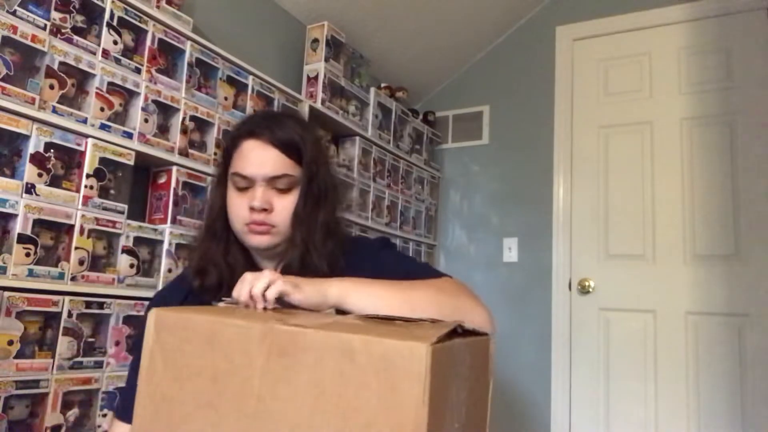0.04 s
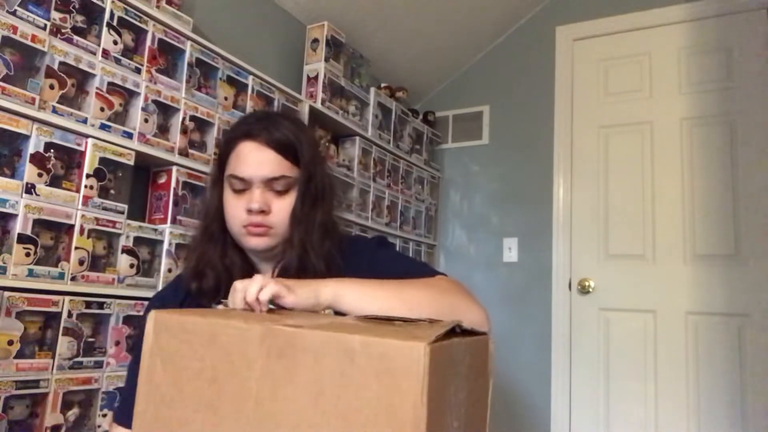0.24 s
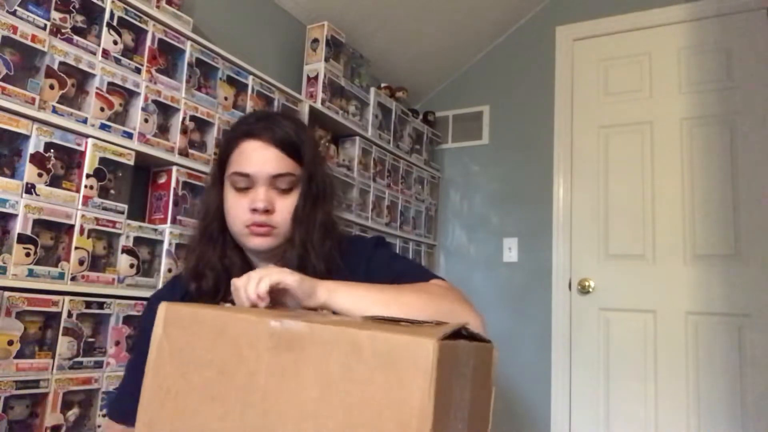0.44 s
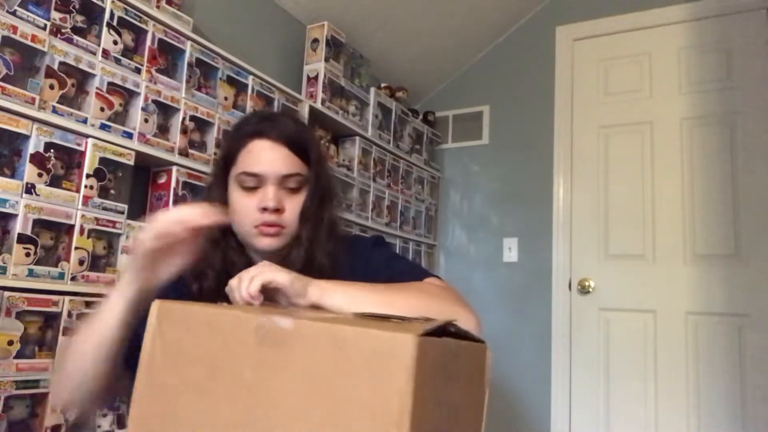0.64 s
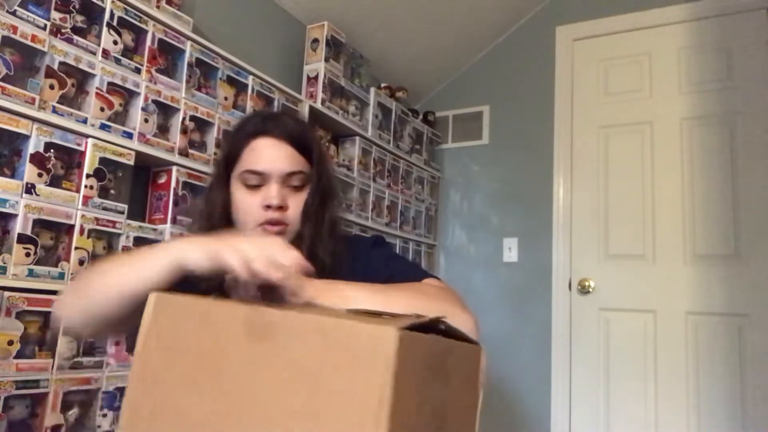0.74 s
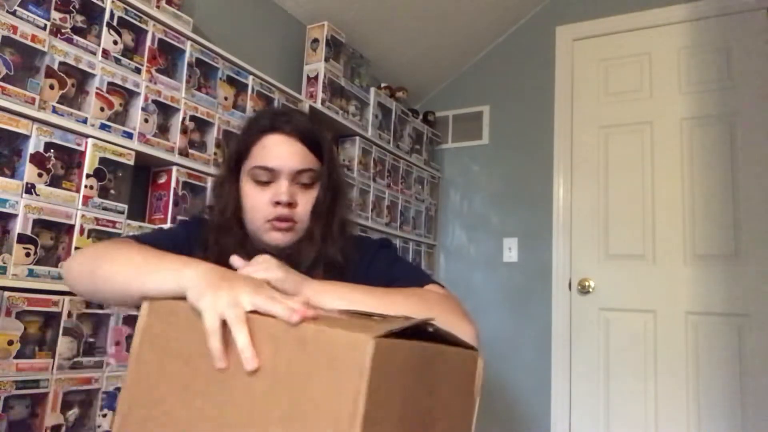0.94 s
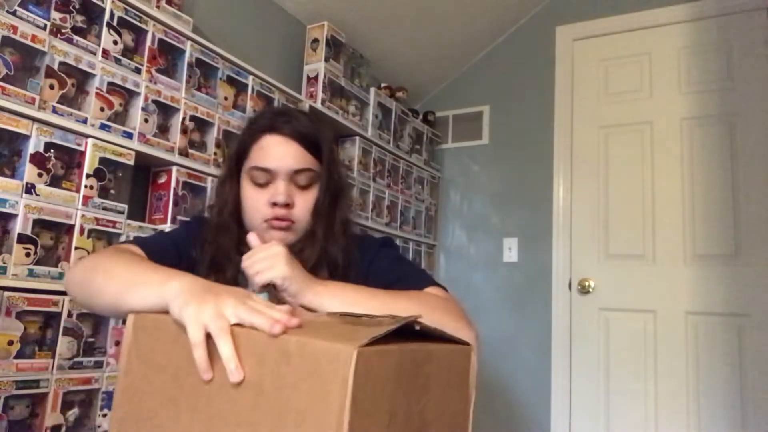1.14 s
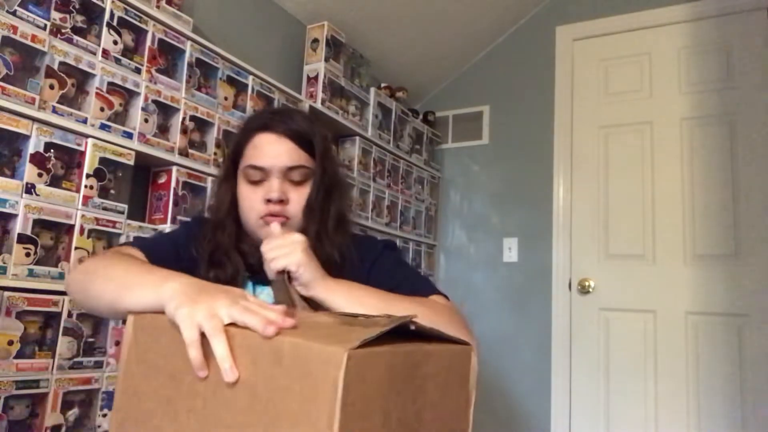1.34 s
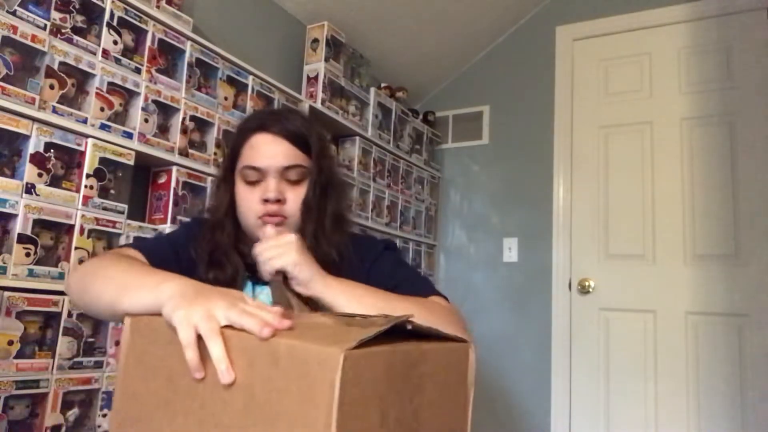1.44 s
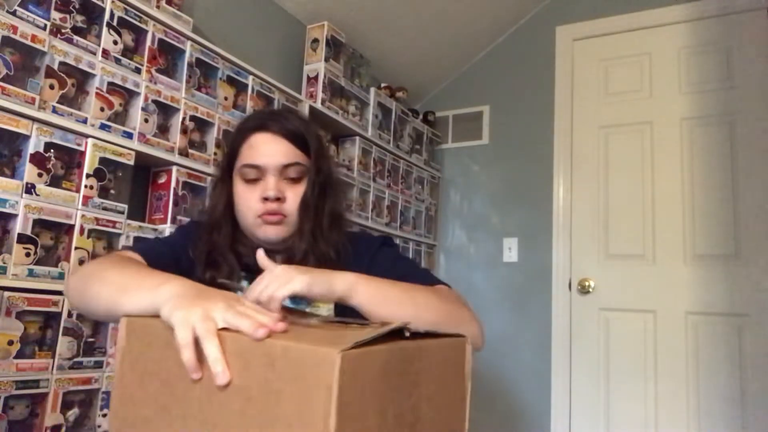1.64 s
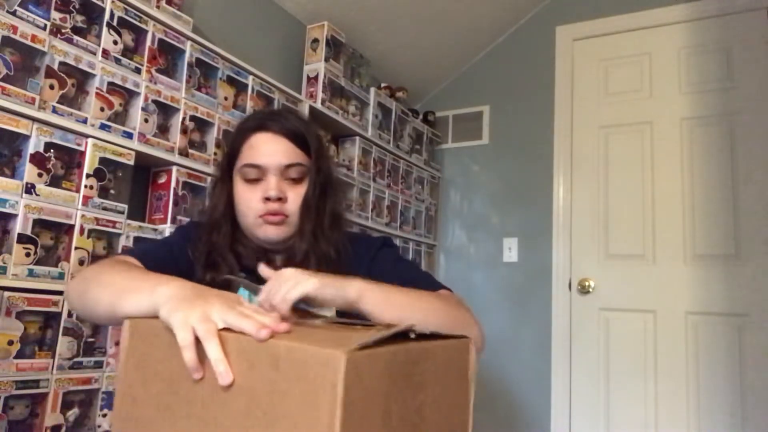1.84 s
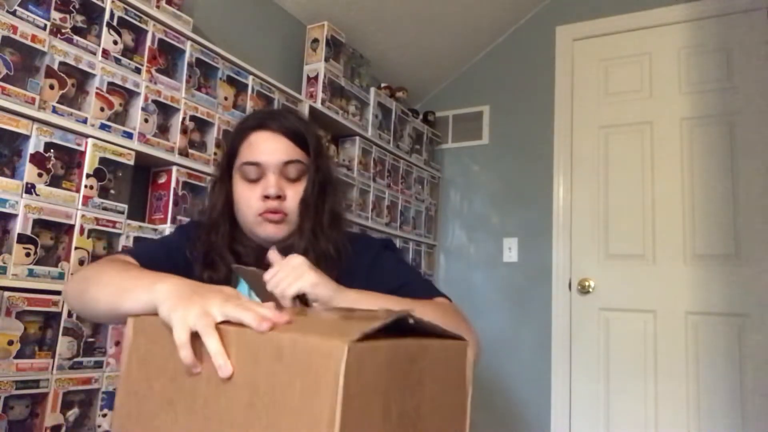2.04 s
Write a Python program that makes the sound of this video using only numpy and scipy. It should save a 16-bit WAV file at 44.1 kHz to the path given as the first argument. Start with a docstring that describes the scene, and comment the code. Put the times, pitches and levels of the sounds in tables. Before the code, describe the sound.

Tape on a cardboard box is scratched and picked by nails, snapping loudly around the middle

```python
"""Fingers work at packing tape on a cardboard box in a small furnished room, a metre from a microphone.
A nail tick opens and a nail drags across the tape, as slips filtered by three broad resonances.
Soft thumps, dying sines, follow, then more ticks, short rings with tape crack and box modes behind.
Louder snaps, built alike, break out mid-way and return among further ticks and thumps.
Scraping, coloured slips and noise of varying level, and a steady hush of noise run throughout."""
import sys
import numpy as np
from scipy import signal
from scipy.fft import rfft, irfft
from scipy.io import wavfile

SR = 44100
rng = np.random.default_rng(int(sys.argv[2]) if len(sys.argv) > 2 else 0)


def gain_from_db(level_db):
    """Turn a decibel level (scalar or array-like) into a linear amplitude factor."""
    decades = np.asarray(level_db, float) / 20
    return 10 ** decades


def inscribe(sig):
    """Save sig as 16-bit PCM at rate SR to the path in sys.argv[1].

    A 1-D sig is mono; a 2-D sig holds one channel per row.
    Samples are clipped to [-1, 1] before scaling.
    """
    pcm = np.round(np.clip(np.atleast_2d(sig).T, -1, 1) * 32767)
    wavfile.write(sys.argv[1], SR, pcm.astype(np.int16))


N = 91375  # length in samples


def evened(x):
    """Normalization: scales a signal to rms 1."""
    return x / np.sqrt(np.mean(x ** 2) + 1e-20)


def read(points, hz):
    """Linear interpolation of a table on a logarithmic frequency axis."""
    f, value = np.transpose(points)
    return np.interp(np.log(hz + 1), np.log(f + 1), value)


def add(mix, s, sound):
    """Superposition: adds a sound to the mix in place, from time s."""
    part = mix[round(s * SR):][:len(sound)]
    part += sound[:len(part)]


def coloured(x, spectrum):
    """Linear filtering: multiplies the spectrum by a response, then scales to rms 1."""
    response = gain_from_db(read(spectrum, np.fft.rfftfreq(len(x), 1 / SR)))
    return evened(irfft(rfft(x) * response, len(x)))


def ring(hz, t60):
    """Free vibration of a damped mode: a sine losing 60 dB in t60 seconds."""
    t = np.arange(SR // 4) / SR
    return gain_from_db(-60 * t / t60) * np.sin(2 * np.pi * hz * t)


def burst(t60):
    """Exponentially decaying noise, scaled to energy 1."""
    puff = rng.standard_normal(512) * gain_from_db(-60 * np.arange(512) / SR / t60)
    return puff / np.linalg.norm(puff)


def snaps():
    """Directivity of tape letting go: less crack in the direct sound, reflections in the even colour."""
    # tape letting go: t/s, level/dB, ring f/Hz, box level/dB, f/Hz where the box is driven most,
    # crack level/dB before doubling
    releases = [(1.0916, -13, 5470, -13.5, 2560, 7.5), (1.0928, -3.5, 1966, -13, 1220, -9),
                (1.2854, -18, 2190, -5, 635, -6), (1.7151, -26.5, 4450, -19.5, 1710, 8.5)]
    t60_s, room_db = 0.005, -2.5
    direct_crack_db = -2.5  # the box top faces up, so less of the crack reaches the microphone directly
    out = np.zeros(N)
    for s, db, hz, box_db, box_hz, crack_db in releases:
        near = click(db, hz, t60_s, box_db, box_hz, crack_db + direct_crack_db, spray=True)
        spread = click(db, hz, t60_s, box_db, box_hz, crack_db, spray=False)
        near, spread = [np.pad(x, (0, SR // 2)) for x in (near, spread)]
        reflections = reverberate(spread, room_db) - spread
        add(out, s, near + reflections)
    return out


def click(db, hz, t60, box_db, box_hz, crack_db, spray=True):
    """Impact response: a ring where the nail hits, the crack of the tape and the box behind."""
    rise_s = 0.0005
    t = np.arange(SR // 4) / SR
    onset = np.minimum(t / rise_s, 1)
    out = onset * (ring(hz, t60) + gain_from_db(box_db) * box(box_hz))
    add(out, 0, 2 * gain_from_db(crack_db) * crack(spray))
    return gain_from_db(db) * out


def crack(spray=True):
    """Broadband release of taut tape: a spray of slips or one clean slip, energy 1."""
    # colour of the tape: f/Hz, response/dB
    tape = [(1500, 0), (3600, -5), (6300, 0), (8500, -9), (13000, -11.5), (16500, -25)]
    t60_s = 0.0027
    slip = burst(t60_s) if spray else np.arange(512.) == 0
    slip = np.pad(slip, (16, 496))
    return coloured(slip, tape) / np.sqrt(len(slip))


def box(centre_hz, octaves=0.87):
    """Modal superposition: the box walls after one blow, favouring modes near centre_hz."""
    # modes of the box walls: f/Hz, level/dB, t60/s
    modes = [(127, -22, 0.11), (283, -6.5, 0.066), (631, 3, 0.027), (1129, -4, 0.03), (1214, -6, 0.085),
             (1800, 14, 0.0059), (2187, 12.5, 0.0066), (2523, 10, 0.0097), (2895, 5, .014),
             (3566, 12.5, 0.0066)]
    out = 0
    for hz, db, t60 in modes:
        detuning = np.log2(hz / centre_hz) / octaves
        out = out + gain_from_db(db - 1.58 * detuning ** 2) * ring(hz, t60)
    return out


def ticks():
    """Weak impacts of the nail, each exciting a ring, the tape and the box."""
    # small nail ticks: t/s, level/dB, ring f/Hz, crack level/dB before doubling
    taps_of_nail = [(0.022, -39, 1300, -17), (0.595, -42.5, 1880, 12.5), (0.6, -42.5, 2130, -13),
                    (0.693, -41.5, 1440, 4.5), (0.78, -37.5, 3830, 3), (.825, -37, 2740, 8.5),
                    (0.843, -37.5, 2630, 6), (0.858, -32, 4030, -10), (0.899, -27.5, 940, -21),
                    (.9525, -31, 1870, -11), (0.993, -44.5, 1620, 6), (1.0318, -36.5, 1900, -10),
                    (1.048, -44, 5850, 12.5), (1.431, -30, 1060, -24), (1.441, -27.5, 1120, -6.5),
                    (1.455, -31.5, 1160, -25), (1.462, -32, 1130, -32), (1.4942, -48.5, 1070, 10),
                    (1.573, -28.5, 990, -10), (1.797, -39.5, 3880, 9)]
    t60_s, box_db = 0.008, -15.5
    out = np.zeros(N)
    for s, db, hz, crack_db in taps_of_nail:
        add(out, s, click(db, hz, t60_s, box_db, hz, crack_db))
    return out


def thumps():
    """Damped low modes under a soft push, rising over half a period."""
    # soft thumps of arm, palm and flap on the box: t/s, level/dB, f/Hz, t60/s
    pushes = [(0.469, -19, 164, 0.01), (0.481, -11.5, 108.4, 0.032), (0.502, -28, 199, 0.11),
              (0.617, -21.5, 92, 0.029), (1.094, -18.5, 275, 0.039), (1.576, -27.5, 180, 0.032),
              (1.668, -36, 257, 0.072)]
    out = np.zeros(N)
    for s, db, hz, t60 in pushes:
        push = ring(hz, t60)
        onset = np.minimum(np.arange(len(push)) * hz / SR * 2, 1)
        add(out, s, gain_from_db(db) * push * onset)
    return out


def drag():
    """Stick-slip excitation of three broad resonances of tape and board by the nail."""
    # strokes of the nail: t/s, low band level/dB, main band level/dB, upper band level/dB
    strokes = [(0.064, -74, -58, -75), (0.069, -55, -53.5, -54), (0.114, -49, -43, -56.5),
               (.16, -52, -50.5, -58), (0.206, -68, -47, -54), (0.233, -45.5, -36, -45),
               (0.277, -69, -42.5, -53.5), (.33, -57, -65, -76)]
    # low resonance, moving with the pressure: t/s, f/Hz
    low_glide = [(.07, 692), (.17, 535), (.25, 790)]
    # main and upper resonance: f/Hz, width of each of two poles/Hz
    fixed_bands = [(1550, 680), (3200, 920)]
    low_width_hz, grain_spread_db = 142, 2.2
    s, *levels = np.transpose(strokes)
    t = np.arange(N) / SR
    grains = slips(grain_spread_db)
    low_hz = np.interp(t, *np.transpose(low_glide))
    out = np.zeros(N)
    for (hz, width), db in zip([(low_hz, low_width_hz)] + fixed_bands, levels):
        level = gain_from_db(np.interp(t, s, db, -120, -120))
        out += evened(resonate(grains, hz, width)) * level
    return out


def slips(spread_db):
    """Stick-slip friction as a random train of tiny impulses of uneven size, rms 1."""
    slips_per_s = 9000
    size = gain_from_db(spread_db * np.minimum(rng.exponential(1, N), 4))
    happens = rng.random(N) < slips_per_s / SR
    return evened(rng.standard_normal(N) * size * happens)


def resonate(x, hz, width):
    """Heterodyne resonance: shifts the curve hz down to zero, smooths twice, and shifts back."""
    turn = np.exp(2j * np.pi * np.cumsum(hz * np.ones(len(x))) / SR)
    r = np.exp(-np.pi * width / SR)
    smooth = x / turn
    for _ in range(2):
        smooth = signal.lfilter([1 - r], [1, -r], smooth)
    return (turn * smooth).real


def scrape():
    """Sliding friction: skin excites the board, hisses with pricks of glue, and rumbles in the hollow box."""
    # strength of the scraping: t/s, board level/dB, skin hiss level/dB, box rumble level/dB
    strength = [(0, -67, -67.5, -53), (0.098, -95, -51, -62.5), (.17, -72, -59, -72),
                (0.239, -55, -48.5, -64), (.33, -67.5, -59, -89), (.43, -70, -62, -62),
                (0.558, -66, -66, -49), (0.629, -84, -75.5, -65), (0.759, -62.5, -61, -55),
                (.8, -54.5, -58.5, -57.5), (.86, -51, -52, -56), (0.952, -40.5, -60, -47),
                (1.02, -62, -62.5, -55), (1.378, -61, -59, -55.5), (1.448, -51, -61.5, -48),
                (1.518, -67, -64, -69), (1.577, -44.5, -51.5, -80), (1.652, -57, -51, -39),
                (1.731, -56, -62.5, -47.5), (1.78, -77, -75, -70), (1.806, -49.5, -58, -54.5),
                (1.866, -56.5, -63, -53.5), (1.957, -48.5, -47.5, -49.5), (2.07, -61.5, -62, -59)]
    # colours of the three layers: f/Hz, response/dB
    board_colour = [(210, 6.5), (350, 4.5), (423, -6.5), (642, 2.5), (749, 2.5), (1780, -8.5), (6000, -27),
                    (13200, -120)]
    skin_colour = [(1760, -6), (3000, -4.5), (12400, -14), (15600, -17), (16300, -31)]
    rumble_colour = [(41, 0), (70, -13), (238, 0.5), (410, -17), (580, -82)]
    crackle_spread_db, board_ring_db, prick_db = 3.4, -11, -11
    s, board_db, skin_db, rumble_db = np.transpose(strength)
    t = np.arange(N) / SR
    grains = slips(crackle_spread_db)
    ringing = evened(signal.oaconvolve(grains, box(473))[:N])
    board = grains + gain_from_db(board_ring_db) * ringing
    skin = grains + gain_from_db(prick_db) * pricks()
    rumble = rng.standard_normal(N)
    layers = [(board, board_colour, board_db), (skin, skin_colour, skin_db), (rumble, rumble_colour, rumble_db)]
    return sum(coloured(x, colour) * gain_from_db(np.interp(t, s, db)) for x, colour, db in layers)


def pricks():
    """Random sparse impulses of glue letting go, convolved with six random cracks, rms 1."""
    pricks_per_s = 120  # all six together
    happens = rng.random((6, N)) < pricks_per_s / 6 / SR
    size = rng.exponential(1, (6, N)) * happens
    return evened(sum(signal.oaconvolve(row, crack())[:N] for row in size))


def reverberate(x, db):
    """Room response by convolution: a few wall echoes and sparse taps dying band by band."""
    # wall echoes: t/s, level/dB
    walls = [(.0025, -1.5), (.008, -3), (0.0161, -10.5)]
    # decay of the room: f/Hz, t60/s
    decay = [(100, 0.34), (1000, 0.25), (4500, 0.23), (15000, 0.17)]
    echo_t60_s = 0.0035
    taps = np.zeros(SR // 2)
    at = np.arange(160, len(taps) - 20, 20)
    taps[at + rng.integers(0, 20, len(at))] = rng.choice([-1., 1.], len(at))
    hz, t, z = signal.stft(taps, SR, nperseg=256)
    dying = gain_from_db(-60 * t / read(decay, hz)[:, None])
    tail = signal.istft(z * dying, SR, nperseg=256)[1]
    tail = tail / np.linalg.norm(tail)
    for s, echo_db in walls:
        add(tail, s, gain_from_db(echo_db) * burst(echo_t60_s))
    return x + gain_from_db(db) * signal.fftconvolve(x, tail)[:len(x)]


def hush():
    """Stationary room tone: Gaussian noise with a fixed spectrum."""
    # colour of the room tone: f/Hz, response/dB
    colour = [(35, 5.5), (56, 14), (95, -2.5), (260, -5.5), (400, -17), (1600, -11.5), (4000, -26),
              (11000, -26.5), (16000, -36)]
    level_db = -56
    return gain_from_db(level_db) * coloured(rng.standard_normal(N), colour)


def scene():
    """Superposition of all sources in the room, over its hush."""
    touches = reverberate(ticks() + thumps(), -7.5)  # room level in dB
    rubbing = reverberate(scrape() + drag(), -11)
    return (snaps() + touches + rubbing + hush())[None]


def roll_off(x):
    """The treble ends steeply here."""
    return signal.sosfilt(signal.butter(12, 16850, fs=SR, output="sos"), x)


def record(dry):
    """High-pass response of the microphone, which cuts the deepest bass."""
    low_hz = 52
    highpass = signal.butter(4, low_hz, "highpass", fs=SR, output="sos")
    mix = signal.sosfilt(highpass, dry)
    return roll_off(mix)


dry = scene()
out = record(dry)
inscribe(out)
```